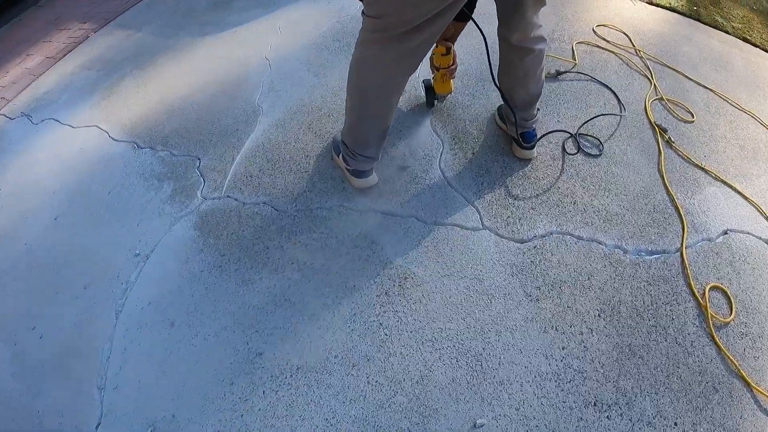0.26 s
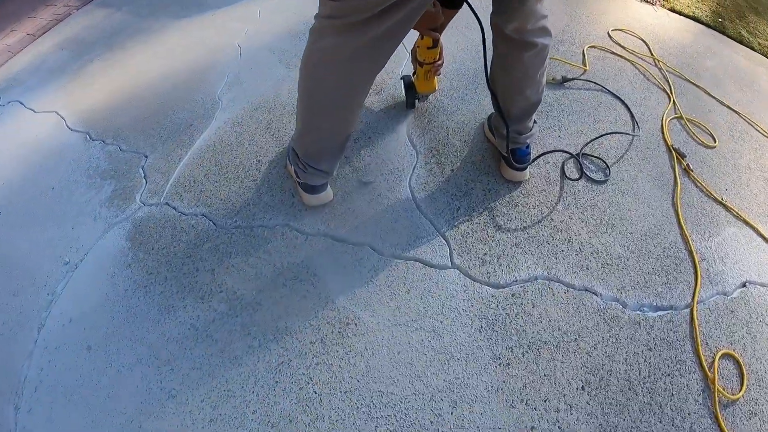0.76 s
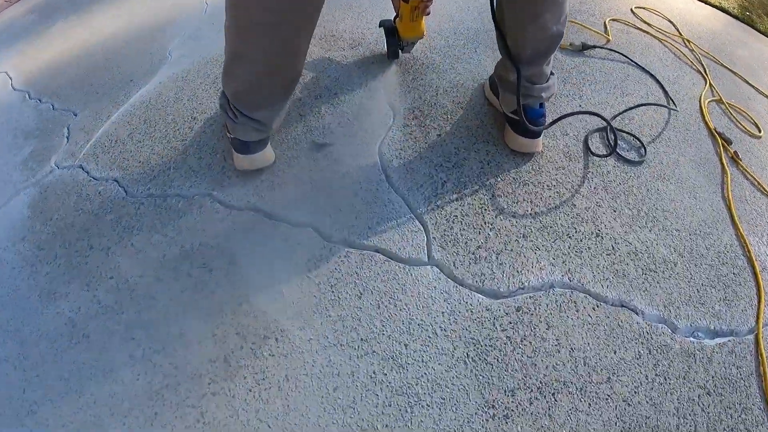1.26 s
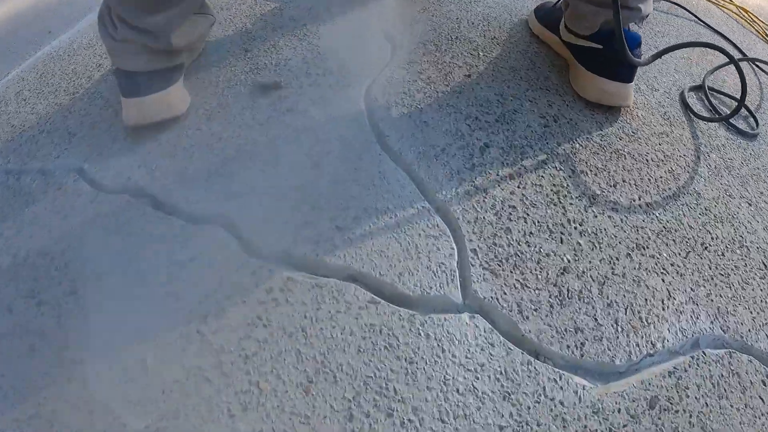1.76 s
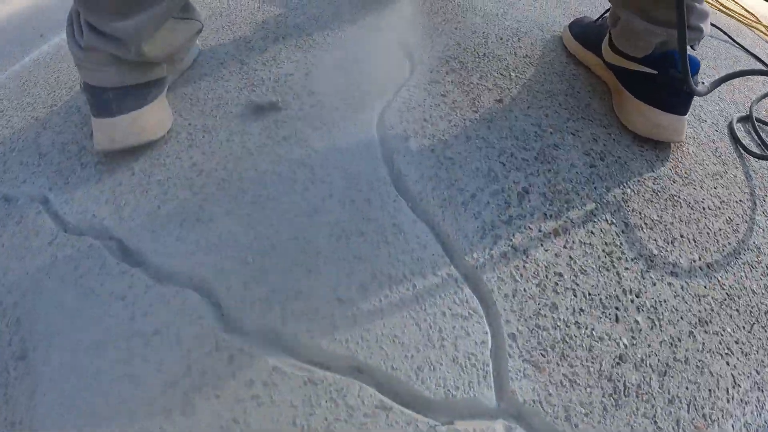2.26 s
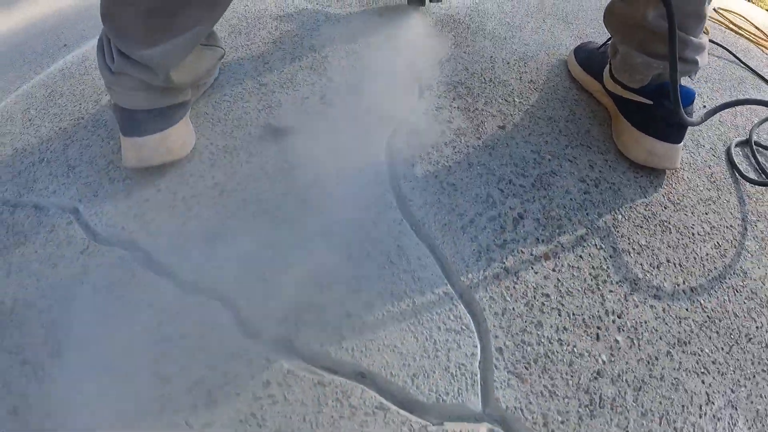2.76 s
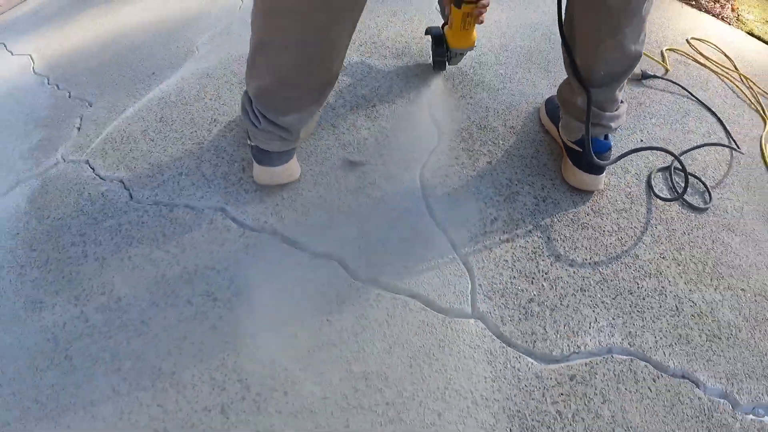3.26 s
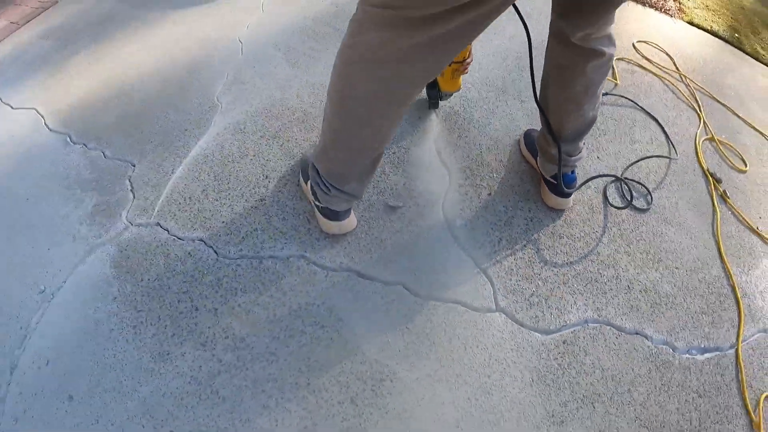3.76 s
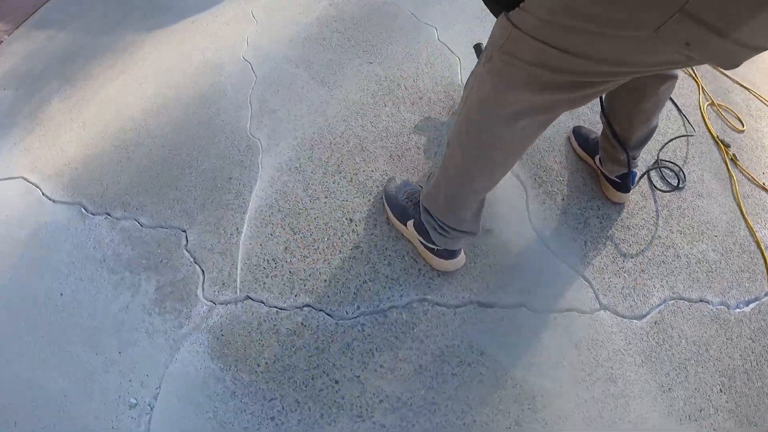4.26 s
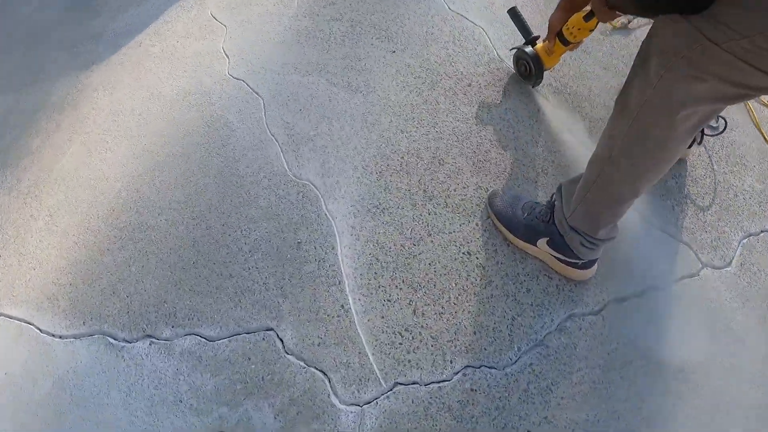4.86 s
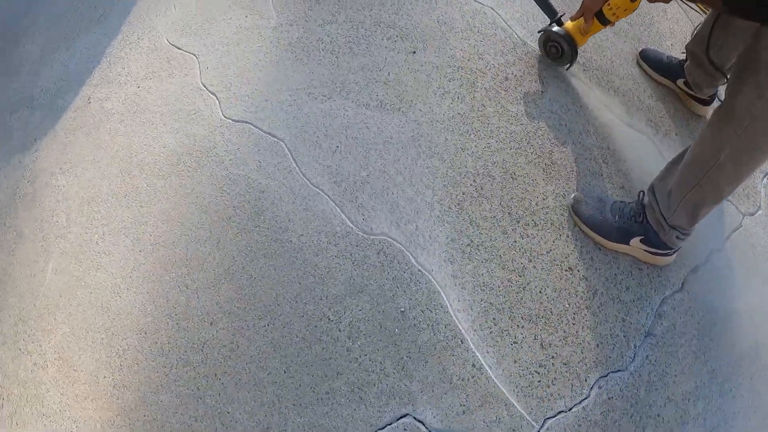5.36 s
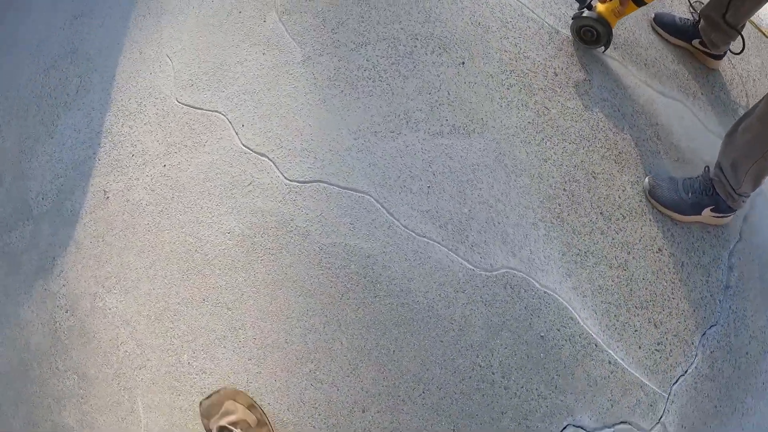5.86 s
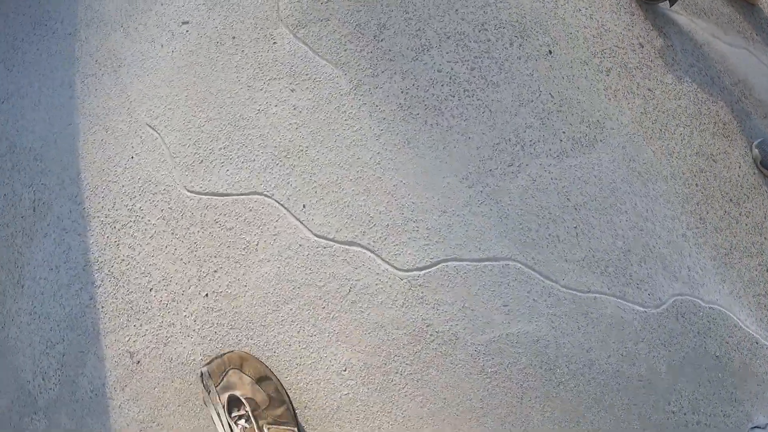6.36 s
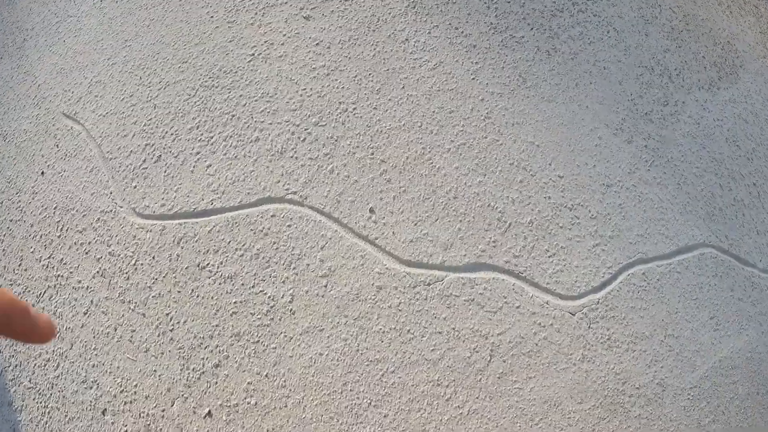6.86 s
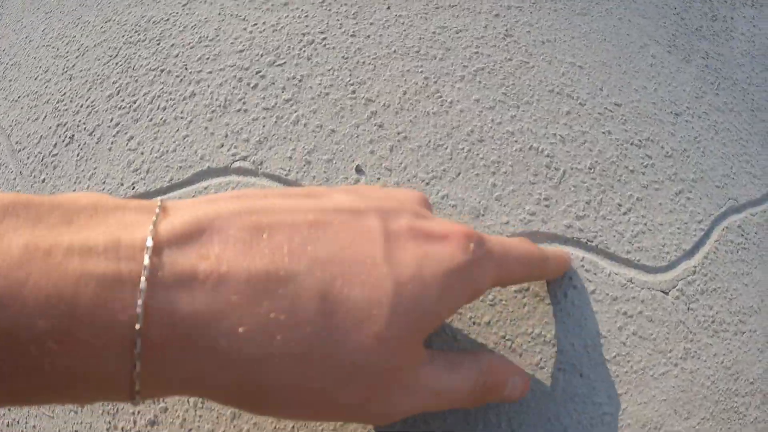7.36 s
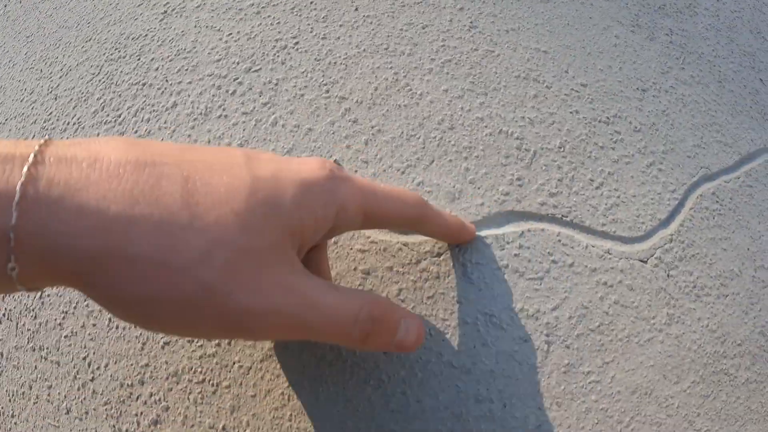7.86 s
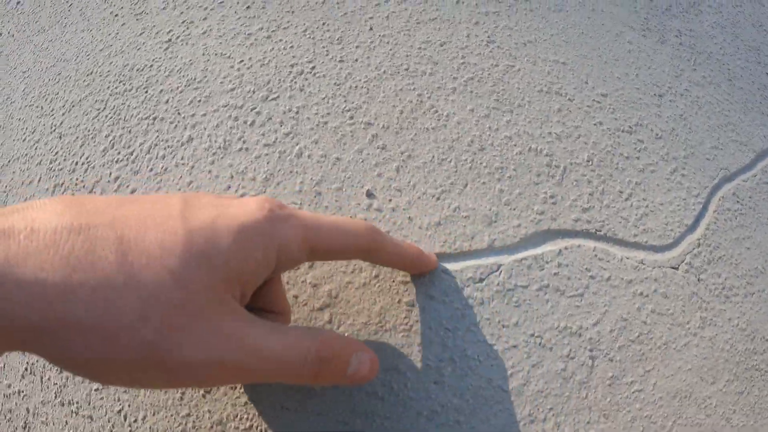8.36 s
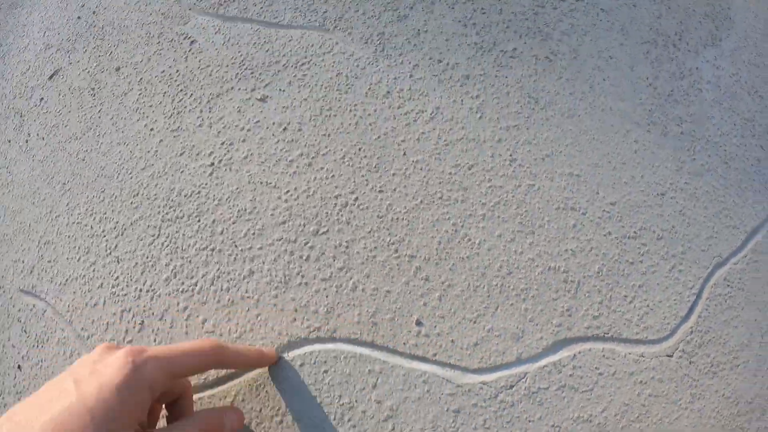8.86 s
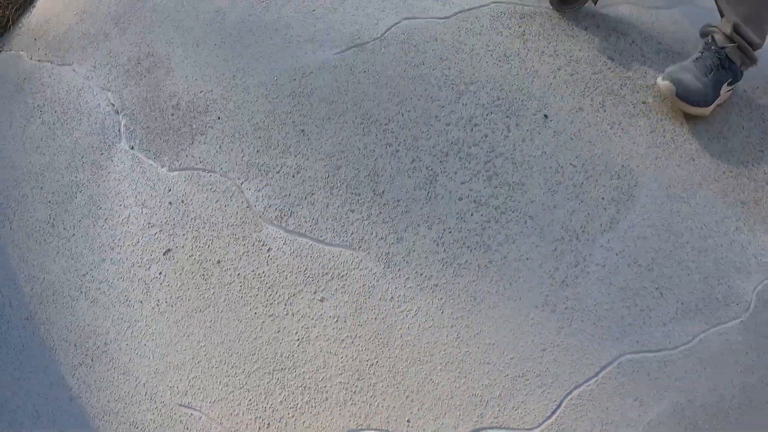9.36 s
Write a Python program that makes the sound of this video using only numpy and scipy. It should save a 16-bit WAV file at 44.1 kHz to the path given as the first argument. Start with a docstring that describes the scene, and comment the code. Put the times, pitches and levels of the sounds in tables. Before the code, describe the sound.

Nonstop abrasive grinding on concrete outdoors: sandy scraping and tiny stone chips, a high electric whine, and glassy squeals from the steel blade. The first half is centred, with a fuller, rougher bite around two to three seconds. Then the source shifts a little right, the whine weakens, and piercing squeals crowd in over brighter, hissier grit. A handheld stereo pair stands nearby; the space is open with barely any echo.

```python
"""A concrete driveway, where an angle grinder chases cracks a few steps from two moving microphones.
Grit rasps under the steel blade: random scraping and chips, shaped in spectrum and in level.
Bending modes of the disc squeal, driven by the rim's repeated scrape; blade speed sags as it bites.
As the operator turns, the rasp changes colour and moves to the right.
Armature whine, gear buzz and chatter are tones locked to rotation; the yard returns a faint echo."""
import sys
import numpy as np
from scipy import signal
from scipy.io import wavfile
from scipy.ndimage import uniform_filter1d, map_coordinates

SR = 44100
rng = np.random.default_rng(int(sys.argv[2]) if len(sys.argv) > 2 else 0)


def waveform_to_disk(signal):
    """Save audio, clipped to [-1, 1], as 16-bit WAV at the path in sys.argv[1]."""
    frames = np.transpose(np.atleast_2d(signal))
    scaled = np.clip(frames, -1, 1) * 32767
    samples = np.round(scaled).astype(np.int16)
    wavfile.write(sys.argv[1], SR, samples)


N = 423801
TIME = np.arange(N) / SR

# blade speed, sagging as it bites: t/s, speed/(turns per s)
BLADE_SPEED = [(0, 128.4), (.3, 129), (.65, 129), (.9, 129.9), (1.45, 130.1), (1.9, 128.4), (2.3, 127.3),
               (2.85, 124.3), (3.2, 126.1), (3.65, 127.5), (4, 127.5), (4.9, 123.9), (5.7, 124),
               (6.25, 126.6), (6.85, 126.9), (7.45, 124.4), (8.3, 123.4), (8.85, 123.9), (9.6, 128.3)]
# each mode rises with speed, as bending waves ride round with the disc: f/Hz per turn per s, reference speed
RIDE_HZ_PER_TURN, USUAL_SPEED = 4.0, 126.3

# low background drone: t/s, level/dB
DRONE_LEVEL = [(0, -60), (.9, -72), (1.9, -61), (2.15, -54), (2.5, -66), (4.5, -72), (6.9, -68), (7.3, -58),
               (7.85, -55.5), (8.5, -54.5), (9.61, -60)]

# the operator swings the grinder from straight ahead to the right: t/s, share of the turn (0-1)
TURN = [(4.1, 0), (4.6, 0.97)]
# level difference of the microphones: t/s, left minus right/dB
PAN = [(0, 0), (4.1, 0), (4.7, -1.7), (5.3, -1.9), (6.7, -3.4), (7.4, -1.9), (8.3, -1), (9.4, -2.7)]
# after the turn the body between the microphones delays the far one: f/Hz, phase/rad
LEAD_PHASE = [(1200, -0.039), (2200, -0.63), (3300, -0.93), (5000, -0.51), (7500, -0.52), (10500, -0.14)]
# the shortest waves bend round that body, out of step; sign reverses over the turn: f/Hz, phase/rad
DIFFRACTION_PHASE = [(11200, 0), (11800, .7), (12300, 1.9), (15000, 1.9)]

# motor as the operator turns: t/s, whine level/dB, gain of the gear buzz past the legs/dB
MOTOR_LEVELS = [(0, -49, 1), (.8, -47.5, -5), (1.6, -48.5, 1), (2.4, -43, 0), (3.2, -45.5, 3), (4, -47, -9),
                (4.6, -46, 2.5), (4.85, -52.5, -6), (5.6, -56.5, -4), (6.3, -54, -4), (6.65, -58, 0),
                (7.2, -55, 5), (8.4, -56, 4.5), (9.6, -54, -9)]
GEAR_RATIO = 14 / 3  # armature turns per blade turn
# armature overtones: multiple of armature speed, relative level/dB
ARMATURE_OVERTONES = [(2, -12.5), (9, -8), (10, -36), (12, -6)]
# buzz of spindle and gear head: multiple of blade speed, relative level/dB
GEAR_BUZZ = [(4, -57.5), (6, -58), (7, -56), (14, -49.5), (15, -49.5), (16, -54), (19, -46), (23, -47.5),
             (26, -56), (28, -56), (33, -50)]
# spindle hum: t/s, then level/dB of each multiple of blade speed listed below
HUM_LEVELS = [(0, -54, -68, -67), (1.1, -54, -69, -70), (1.8, -54, -60, -62), (4.25, -56, -69, -68),
              (4.55, -46, -67, -67), (4.85, -54, -67, -68), (5.25, -48, -67, -66), (5.75, -44.5, -67, -68),
              (6.1, -53, -63, -65), (6.9, -51, -63, -65), (7.25, -51, -56, -61), (7.8, -50, -55, -56),
              (8.1, -53, -63, -63), (9.61, -54, -62, -65)]
HUM_MULTIPLES = (8, 2, 1)

# notes locked to the rotation: t/s, length/s, level/dB, multiple of blade speed
CHATTER_NOTES = [(1.56, .24, -30, 38), (1.8, .14, -37, 38), (2.39, .44, -34.5, 39), (2.38, .3, -37, 41),
                 (2.44, .25, -37.5, 33), (2.4, .45, -42, 23), (3.08, .25, -38, 33), (3.06, .26, -42, 41),
                 (4.85, 1.05, -44, 24), (4.5, .65, -40.5, 39), (3.5, .5, -39, 50), (5.96, .19, -32, 39),
                 (5.96, .43, -39.5, 33), (6.0, 1.2, -52, 19), (7.2, 1.95, -47.5, 19), (7.85, .5, -47, 15),
                 (7.3, 1.1, -50, 20), (7.75, .9, -50, 26), (8.65, .25, -42, 26), (7.98, .33, -48, 28),
                 (8.97, .42, -45, 21), (9.0, .15, -42, 19), (9.12, .085, -28, 39), (9.195, .08, -30.5, 43),
                 (9.18, .13, -37, 41)]
CHATTER_FADE_S = .09

# squealing modes by name: f/Hz, width/Hz, idle level/dB, share of drive free of the rotation
# (limited to 0-1), share of the treble's swing that the idle level follows
SQUEAL_MODES = {"A": (4166, 19, -46, 0, 1.3), "B": (4915.5, 16, -42.5, 0.24, -0.1),
                "C": (5422.5, 6.5, -39.5, -0.4, 0.3), "D": (6431, 9, -40.5, 0.2, 0),
                "E": (7609.5, 14.5, -43, 0.5, 1), "F": (8611, 15, -49, 2, 0.6)}
# squeals as the blade binds in the crack: t/s, length/s, level/dB, mode name
SQUEALS = [(1.3, .28, -42, "A"), (3.078, 0.26, -43, "A"), (3.46, 0.11, -36, "A"), (5.3, 0.2, -39, "A"),
           (6.57, .25, -40.5, "A"), (6.92, .11, -37.5, "A"), (.6, 0.23, -35, "B"), (.93, .08, -34, "B"),
           (1.12, 0.09, -32.5, "B"), (1.26, .17, -36, "B"), (1.45, 0.076, -28.5, "B"),
           (1.54, 0.31, -39, "B"), (2.547, 0.082, -37, "B"), (2.704, 0.11, -36, "B"),
           (3.088, .08, -29.5, "B"), (3.2, 0.8, -36.5, "B"), (4.255, 0.18, -29.5, "B"),
           (4.45, 0.92, -38, "B"), (4.878, 0.1, -33.5, "B"), (5.806, 0.48, -35.5, "B"),
           (6.2, .13, -37, "B"), (6.45, .22, -36.5, "B"), (6.673, 0.13, -28.5, "B"),
           (6.857, 0.13, -30.5, "B"), (7.953, .06, -34, "B"), (9.05, 0.33, -30, "B"),
           (.15, 0.14, -32.5, "C"), (1.5, .08, -38, "C"), (3.13, .06, -32, "C"), (4.72, 0.2, -34, "C"),
           (4.98, 0.16, -30, "C"), (5.2, 0.17, -33, "C"), (5.962, 0.32, -35, "C"), (6.137, 0.09, -30, "C"),
           (7.56, 0.25, -38, "C"), (7.015, 0.25, -34.5, "C"), (7.378, .16, -29, "C"),
           (7.777, 0.14, -36, "C"), (8.007, 0.3, -30.5, "C"), (8.388, 0.17, -31.5, "C"),
           (8.64, 0.21, -34.5, "C"), (9.195, 0.13, -31, "C"), (0.068, .33, -38.5, "D"),
           (.165, .06, -32, "D"), (0.975, 0.11, -28.5, "D"), (1.533, 0.23, -37, "D"),
           (1.745, 0.21, -30, "D"), (2.027, 0.43, -35, "D"), (2.49, .08, -29, "D"), (2.6, 0.37, -41, "D"),
           (3.13, 0.06, -30, "D"), (3.62, .08, -31.5, "D"), (3.925, 0.088, -31, "D"),
           (4.23, 0.73, -33, "D"), (4.8, 0.07, -24, "D"), (4.855, 0.27, -31.5, "D"),
           (4.98, 0.061, -26, "D"), (5.333, 0.37, -28.5, "D"), (5.54, 0.084, -25, "D"),
           (5.664, 0.099, -27.5, "D"), (5.8, 0.13, -28.5, "D"), (5.94, 0.22, -29, "D"),
           (6.295, 0.33, -29.5, "D"), (6.4, 0.11, -25, "D"), (6.77, .23, -32.5, "D"),
           (7.01, 0.15, -25, "D"), (7.14, .08, -40, "D"), (7.54, 0.067, -40, "D"),
           (8.048, 0.26, -29.5, "D"), (8.385, 0.18, -27, "D"), (8.597, 0.18, -31.5, "D"),
           (8.802, .07, -29.5, "D"), (8.93, 0.21, -33.5, "D"), (9.184, 0.044, -26.5, "D"),
           (9.267, 0.22, -28, "D"), (9.43, 0.17, -25, "D"), (.31, .06, -40, "E"), (1.716, 0.13, -37, "E"),
           (2.12, 0.35, -39, "E"), (2.722, 0.29, -36.5, "E"), (3.32, .14, -36, "E"),
           (5.12, 0.59, -41.5, "E"), (6.354, 0.064, -36, "E"), (6.623, .14, -35.5, "E"),
           (6.814, 0.084, -29.5, "E"), (7.218, 0.11, -34.5, "E"), (8.925, 0.11, -31.5, "E"),
           (9.33, 0.098, -34, "E"), (2.74, .23, -39, "F"), (6.35, 0.041, -36, "F"), (6.626, 0.12, -35, "F"),
           (7.905, 0.45, -42, "F"), (8.918, 0.14, -37, "F"), (9.34, 0.097, -37, "F")]
ATTACK_S, RING_S = .055, 0.041  # linear rise; time constant of the ring-down
STRAY_HZ, STRAY_RATE_HZ = 8, 3  # rms stray of pitch as the blade flexes, and its fastest rate
# broad blade modes, following BIND_LEVEL and SNARL_LEVEL in turn: f/Hz, width/Hz, relative level/dB
BROAD_MODES = [(5200, 110, 2), (2965, 160, -13)]
# the first broad mode sings loudest when the blade binds: t/s, level/dB
BIND_LEVEL = [(0, -56), (2.3, -50), (2.9, -46), (3.45, -45), (4.1, -47), (4.35, -53), (4.8, -46),
              (5.25, -45), (5.55, -50), (6.15, -50), (6.45, -57), (8, -49), (9.6, -54)]
# highest blade modes: f/Hz, width/Hz, level relative to the treble/dB
TOP_MODES = [(8780, 30, -4), (9783, 25, -13), (10006, 20, -3.5), (10120, 40, -13.5), (10700, 40, -16),
             (11720, 55, -7), (12330, 55, -7.5), (12750, 40, -18), (13189, 20, -12), (13991, 30, -22)]

# mean spectrum of the rasp, shape only: f/Hz, relative level/dB
RASP_SPECTRUM = [(30, -18), (100, -16.5), (280, -13.5), (480, -8.5), (600, -6.5), (760, -5), (1050, -3),
                 (1500, -4), (2150, -4.5), (2500, -1.5), (3100, -1), (4500, -4), (7000, -8), (8100, -15),
                 (11200, -18.5), (12400, -15.5), (13600, -18.5), (15400, -30)]
RASP_DB = -29.5
# body of the rasp, used as swing about its mean power: t/s, level/dB
BODY_LEVEL = [(0, -40), (0.55, -38.5), (1.2, -38), (2.05, -32.5), (2.55, -33), (3.2, -33.5), (3.75, -38),
              (4.15, -36), (4.55, -36), (4.72, -38), (4.87, -41), (5.1, -40), (5.25, -37.5), (5.8, -39),
              (6.5, -39), (7.12, -37), (7.25, -35.5), (7.9, -35), (8.5, -36), (9.05, -36), (9.25, -41.5),
              (9.61, -38)]
# snarl near 2.6 kHz; the rasp uses its swing, the second broad mode its level: t/s, level/dB
SNARL_LEVEL = [(0, -35.5), (0.55, -34.5), (1.45, -35), (2.05, -32.5), (3.05, -33.5), (3.5, -35.5),
               (3.95, -38), (4.5, -36.5), (4.85, -35.5), (5.25, -33), (6.05, -34), (6.4, -32.5),
               (6.65, -37), (7.05, -35.5), (7.4, -32.5), (7.9, -32), (8.5, -35), (9.05, -33.5), (9.25, -39),
               (9.61, -36)]
# sharp edge near 3.6 kHz, used as swing about its mean power: t/s, level/dB
EDGE_LEVEL = [(0, -32), (0.55, -29.5), (1.45, -30.5), (1.9, -38), (3.05, -38.5), (3.35, -32.5), (3.75, -29),
              (4.1, -34.5), (4.7, -34.8), (5.4, -36), (6.1, -39), (6.7, -36), (7.05, -39), (8.3, -35.5),
              (8.55, -35.5), (9.05, -37), (9.25, -41), (9.61, -35.5)]
# treble; rasp and idle modes use its swing, the highest modes its level: t/s, level/dB
TREBLE_LEVEL = [(0, -54), (0.6, -50), (1.5, -49), (2.3, -51.5), (3.2, -48.5), (3.95, -48), (4.4, -50),
                (4.85, -46), (5.198, -42.5), (5.55, -46.5), (6.6, -42), (7.08, -44.5), (7.3, -41.5),
                (8.3, -38.5), (9.05, -41.5), (9.3, -46), (9.61, -44.5)]
# how far the rasp follows those swings: f/Hz, shares of body, snarl, edge and treble
FOLLOW_SHARES = [(160, 0, -0.052, -0.16, -0.1), (400, 0.76, 0.035, -0.043, -0.28),
                 (680, 1.05, 0.43, 0.21, -0.3), (1060, 1.08, -0.32, 0.0025, 0.0027),
                 (1480, 1.2, -0.023, 0.088, 0.41), (2240, 1.24, 0.69, 0.14, 0.078),
                 (2590, 0.013, 1.9, -0.13, -0.44), (3570, 0.17, -0.039, 0.96, -0.25),
                 (4400, 0.007, 0.21, 1, -0.0056), (5300, 0.92, -1.2, 0.51, -0.29),
                 (7040, 0.3, 0.63, -0.62, -0.29), (10200, 0.3, 1.5, 0.74, 0.74),
                 (12100, 0.7, -1.4, -0.31, 0.79), (14000, 0.65, 0.5, -0.12, 0.77)]
# colour of the rasp once the operator has turned: f/Hz, gain/dB
TURNED_COLOUR = [(150, -0.5), (300, 2), (480, -0.5), (800, -0.5), (1050, 1), (1550, -0.5), (2000, 1.5),
                 (2700, 1.5), (3600, 1.5), (4600, -0.5), (6000, 0.5), (8100, -4), (10500, 2.5),
                 (12200, -4.5), (13600, -10)]
# bounce off the slab as tool and microphones move: t/s, delay/s, comb depth/dB
BOUNCE = [(0, 0.0012, 1.5), (1.45, 0.0014, 0.5), (1.7, 0.0015, 0), (2.9, 0.0018, -0.5), (3.3, 0.0012, -0.5),
          (4.4, 0.0013, 1), (4.6, 0.00078, 0), (4.95, 0.00077, 1.5), (5.45, 0.001, 3), (5.95, 0.00087, 1.5),
          (6.4, 0.0008, 2), (7.1, 0.0011, 0.5), (7.4, 0.00069, 1), (8, 0.00069, 0.5), (9.6, 0.0013, 0.5)]
DUCK_DB = -26  # squeal level that halves the rasp's power relative to no squeal

EDGE_HZ = 15300  # upper band limit


def amp(db):
    """Level in decibels as an amplitude ratio."""
    return 10 ** (np.asarray(db) / 20)


def unit(x):
    """Normalisation to unit root-mean-square."""
    return x / np.sqrt(np.mean(abs(x) ** 2) + 1e-20)


def curves(rows, t=TIME):
    """Linear interpolation of each table column in time."""
    s, *columns = np.transpose(rows)
    return [np.interp(t, s, column) for column in columns]


def swing_db(rows, t=TIME):
    """A level curve relative to its own mean power."""
    return 20 * np.log10(unit(amp(curves(rows, t)[0])))


def read(points, hz):
    """Interpolation of a spectrum, linear in log frequency."""
    f, value = np.transpose(points)
    return np.interp(np.log(hz + 1), np.log(f), value)


def wander(rate_hz):
    """Random fluctuation of unit rms, with knots at twice the given rate."""
    knots = rng.standard_normal(8000)
    return unit(np.interp(TIME * 2 * rate_hz, np.arange(len(knots)), knots))


def grip(rate_hz, depth_db):
    """Stick and slip: friction catches and releases, a unit-rms gain flipping softly between two states."""
    t = TIME[::100]
    knots = rng.standard_normal(2000)
    state = np.tanh(2 * unit(np.interp(t * 2 * rate_hz, np.arange(len(knots)), knots)))
    return np.interp(TIME, t, unit(amp(depth_db * state)))


def gate(start, length, attack_s, release_s, t=TIME):
    """Envelope with a linear rise, a hold at 1 and a linear fall."""
    rise = np.clip((t - start) / attack_s + .5, 0, 1)
    fall = np.clip((start + length - t) / release_s + .5, 0, 1)
    return rise * fall


def tone(turns, multiple):
    """Harmonic locking: a unit-rms sinusoid at a multiple of the rotation, in random phase."""
    return np.sqrt(2) * np.sin(2 * np.pi * (multiple * turns + rng.random()))


def resonate(x, hz, width):
    """Damped resonance of one mode, as a complex one-pole filter."""
    r = np.exp(-np.pi * width / SR)
    return signal.lfilter([1 - r], [1, -r * np.exp(2j * np.pi * hz / SR)], x)


def crossover(low, high, corner_hz):
    """Band splitting: the bass of one sound joined to the treble of another."""
    def band(kind, x):
        return signal.sosfilt(signal.butter(2, corner_hz, kind, fs=SR, output="sos"), x)

    return band("low", low) + band("high", high)


def air(db, corner_hz):
    """Incoherent low-passed noise: faint outdoor rumble, independent at the two microphones."""
    lowpass = signal.butter(2, corner_hz, fs=SR, output="sos")
    return amp(db) * unit(signal.sosfilt(lowpass, rng.standard_normal((2, N))))


def drone(hz=108, width=50):
    """Resonant filtering of noise, giving a faint low background drone."""
    once = resonate(rng.standard_normal(N), hz, width)
    return amp(curves(DRONE_LEVEL)[0]) * unit(resonate(once, hz, width).real)


def yard(x, t60=0.7, echo_db=-25, count=300):
    """Convolution with sparse, exponentially decaying reflections from ground, legs and walls."""
    length = SR // 4
    taps = np.zeros(length)
    taps[rng.integers(40, length, count)] = rng.choice([-1., 1.], count)
    taps *= amp(-60 * TIME[:length] / t60)
    return amp(echo_db) * signal.fftconvolve(x, taps / np.linalg.norm(taps))[:N]


def ports(x, scatter=0.17, blur=0.14):
    """Interaural-type cues: swung to the right, the source reaches that microphone louder and earlier."""
    hz, t, z = signal.stft(x, SR, nperseg=512)
    pan_db, turn = curves(PAN, t)[0], curves(TURN, t)[0]
    # random phase, smoothed over frequency and then time
    noise = uniform_filter1d(rng.standard_normal(z.shape), size=8, axis=0)
    drift = unit(uniform_filter1d(noise, size=5, axis=1))
    lead = read(LEAD_PHASE, hz)[:, None] * turn
    phase = lead + read(DIFFRACTION_PHASE, hz)[:, None] * (2 * turn - 1)
    phase_spread = (scatter * phase + blur * turn) * drift
    # each microphone takes half of the level and phase difference
    tilt = amp(pan_db / 2) * np.exp(.5j * (phase + phase_spread))
    return signal.istft(np.array([z * tilt, z / tilt]), SR, nperseg=512)[1][:, :N]


def motor(turns, waver_db=-4.0, overtone_db=-49):
    """Harmonics of rotation: armature whine, spindle hum and gear buzz, wavering with knocks of the cut."""
    turns = turns + .012 * wander(22)
    whine_db, buzz_db = curves(MOTOR_LEVELS)
    whine = amp(whine_db) * grip(14, depth_db=2.5) * tone(turns, GEAR_RATIO)
    overtones = sum(amp(overtone_db + db + waver_db * wander(4.2)) * tone(turns, k * GEAR_RATIO)
                    for k, db in ARMATURE_OVERTONES)
    hum = sum(amp(db) * grip(10, depth_db=3) * tone(turns, k)
              for k, db in zip(HUM_MULTIPLES, curves(HUM_LEVELS)))
    buzz = sum(amp(db) * grip(9.7, depth_db=3.0) * tone(turns, k) for k, db in GEAR_BUZZ)
    return whine + overtones + hum + amp(buzz_db - 5.5) * buzz


def chatter(turns, waver_db=1.6):
    """Mode locking: the blade holds an overtone of its rotation, a clean note sliding with speed."""
    out = np.zeros(N)
    for start, length, db, multiple in CHATTER_NOTES:
        envelope = grip(14, depth_db=waver_db) * gate(start, length, CHATTER_FADE_S, CHATTER_FADE_S)
        out += amp(db) * envelope * tone(turns, multiple)
    return out


def rim_force(turns, wear_turns, fresh, size=400):
    """Periodic excitation: the rough rim repeats its scrape each turn and wears; fresh grit adds noise."""
    keep = np.exp(-1 / wear_turns)
    # one row per turn, one column per point of the rim
    rim = signal.lfilter([1], [1, -keep], rng.standard_normal((1500, size)), axis=0).ravel()
    repeated = map_coordinates(rim, [(turns + 100) * size], order=3)
    fresh = np.clip(fresh, 0, 1)
    return np.sqrt(1 - fresh) * unit(repeated) + np.sqrt(fresh) * rng.standard_normal(N)


def squeal_gain(name, let_go_s=0.022):
    """Growth and decay of one mode: each squeal builds up, holds, then rings down exponentially."""
    t = np.arange(N // 50 + 1) * 50 / SR
    gain = np.zeros(len(t))
    for start, length, db, mode in SQUEALS:
        if mode == name:
            rise = np.clip((t - start) / ATTACK_S + .5, 0, 1)
            decay = np.exp(-np.maximum(t - start - length + let_go_s, 0) / RING_S)
            gain = np.maximum(gain, amp(db) * rise * decay)
    return np.interp(TIME, t, gain)


def sing(force, hz, width, hold_s, stray_hz=0, skirt_hz=240, ride_hz=0):
    """Limited resonance: friction steadies a mode's swing over longer spans; it flutters within them."""
    ride = np.exp(2j * np.pi * np.cumsum(ride_hz) / SR)
    stray = np.exp(2j * np.pi * np.cumsum(stray_hz) / SR)
    # resonate in the frame of the shifted mode, then shift back
    ringing = resonate(resonate(force / ride, hz, width), hz, skirt_hz)
    swing = ringing * ride * stray
    window = max(int(hold_s * SR), 2)
    power = uniform_filter1d(uniform_filter1d(abs(swing) ** 2, window), window)
    return np.sqrt(2) * swing.real / np.sqrt(abs(power) + 1e-15)


def blade(turns, squeals, flutter=0.018):
    """Forced modal vibration: overtones of the turning rim slide through the modes of the steel disc."""
    rim, grit = rim_force(turns, wear_turns=13.6, fresh=0.18), rng.standard_normal(N)

    def force(free):
        free = np.clip(free, 0, 1)
        return np.sqrt(1 - free) * rim + np.sqrt(free) * grit

    out = np.zeros(N)
    treble_db = swing_db(TREBLE_LEVEL)
    ride_hz = RIDE_HZ_PER_TURN * (curves(BLADE_SPEED)[0] - USUAL_SPEED)
    for name, (hz, width, idle_db, free, follow) in SQUEAL_MODES.items():
        # the turning disc beams each mode past the listener, which splits it into side tones
        beam = 1 + flutter * np.cos(2 * np.pi * (turns + rng.random()))
        # between squeals each mode rings on quietly
        idle = amp(idle_db + follow * treble_db) * grip(12, depth_db=3.0)
        level = np.hypot(idle, squeals[name]) * grip(16, depth_db=1.7)
        stray = STRAY_HZ * wander(STRAY_RATE_HZ)
        out += level * beam * sing(force(free), hz, width, hold_s=0.028, stray_hz=stray, ride_hz=ride_hz)

    scrape = force(free=0.25)
    broad_levels = curves(BIND_LEVEL) + curves(SNARL_LEVEL)  # a list of two curves
    for (hz, width, db), level_db in zip(BROAD_MODES, broad_levels):
        out += amp(db + level_db) * grip(14, depth_db=6.5) * sing(scrape, hz, width, hold_s=0.096)
    top = sum(amp(db) * grip(8, depth_db=5.5) * sing(scrape, hz, width, hold_s=0.08)
              for hz, width, db in TOP_MODES)
    return out + amp(curves(TREBLE_LEVEL)[0]) * top


def rasp(turns, chips_per_s=1500, chip_spread_db=3.0, chip_db=-10, wobble=0.041, judder_db=0.9):
    """Friction and fracture noise: grains of stone scrape and snap, pulsing as the blade wobbles."""
    sizes = amp(chip_spread_db * np.minimum(rng.exponential(1, N), 4)) * rng.choice([-1, 1], N)
    chips = unit(sizes * (rng.random(N) < chips_per_s / SR))
    # only the treble repeats each turn
    rim = rim_force(turns, wear_turns=23.5, fresh=0.72)
    scrape = crossover(rng.standard_normal(N), rim, corner_hz=1530)
    force = scrape + amp(chip_db) * chips
    force *= (1 + wobble * np.cos(2 * np.pi * turns)) * grip(35, depth_db=judder_db)

    hz, t, z = signal.stft(force, SR, nperseg=1024)
    at_hz, *shares = np.transpose(FOLLOW_SHARES)
    levels = (BODY_LEVEL, SNARL_LEVEL, EDGE_LEVEL, TREBLE_LEVEL)
    motion_db = sum(np.outer(read(list(zip(at_hz, share)), hz), swing_db(level, t))
                    for share, level in zip(shares, levels))
    turned_db = np.outer(read(TURNED_COLOUR, hz), curves(TURN, t)[0])
    # interference with the bounce off the slab combs the spectrum; the delay drifts
    delay, ripple_db = curves(BOUNCE, t)
    comb_db = ripple_db * np.cos(2 * np.pi * hz[:, None] * delay)
    spectrum_db = read(RASP_SPECTRUM, hz)[:, None]
    shaped = z * amp(motion_db + turned_db + comb_db + spectrum_db)
    return amp(RASP_DB) * unit(signal.istft(shaped, SR, nperseg=1024)[1][:N])


def scene():
    """Superposition: one rotation drives motor, chatter, squeal and rasp."""
    turns = np.cumsum(curves(BLADE_SPEED)[0] + 0.0801 * wander(12)) / SR
    squeals = {name: squeal_gain(name) for name in SQUEAL_MODES}
    # the rasp ducks while the blade squeals; its mean power is kept
    squeal_power = sum(gain ** 2 for gain in squeals.values())
    duck = unit(1 / np.sqrt(1 + squeal_power / amp(DUCK_DB) ** 2))
    grinder = duck * rasp(turns) + blade(turns, squeals) + chatter(turns) + motor(turns)
    return ports(grinder + yard(grinder)) + drone() + air(db=-67, corner_hz=207)


def record(dry):
    """Band limitation by a linear-phase low-pass filter."""
    lowpass = signal.firwin(511, EDGE_HZ, window=("kaiser", 9), fs=SR)
    return signal.oaconvolve(dry, lowpass[None], "same")


dry = scene()
out = record(dry)
waveform_to_disk(out)
```